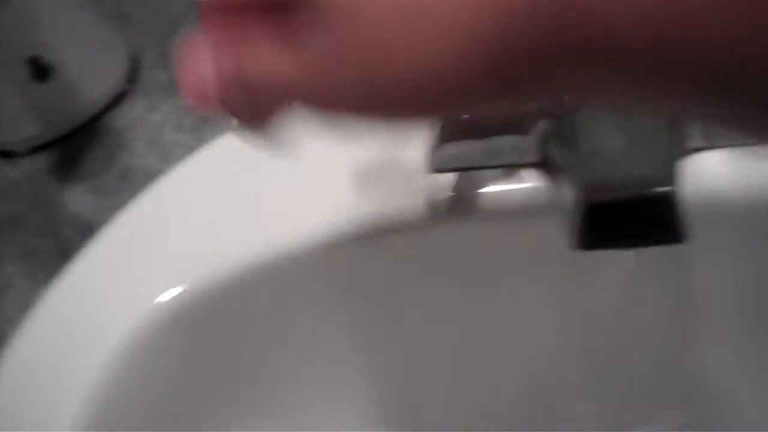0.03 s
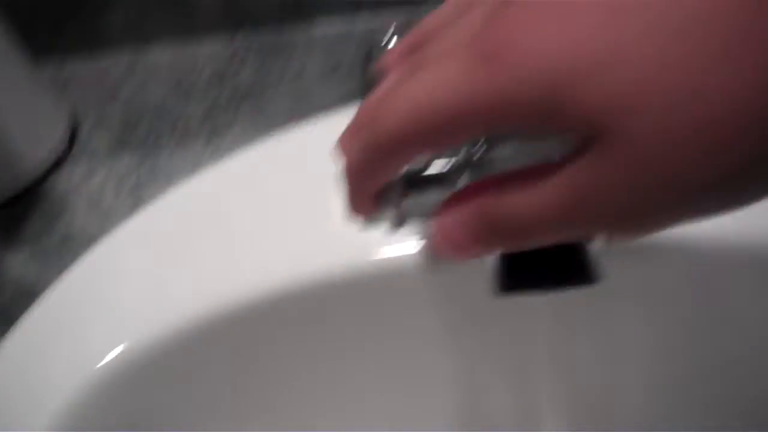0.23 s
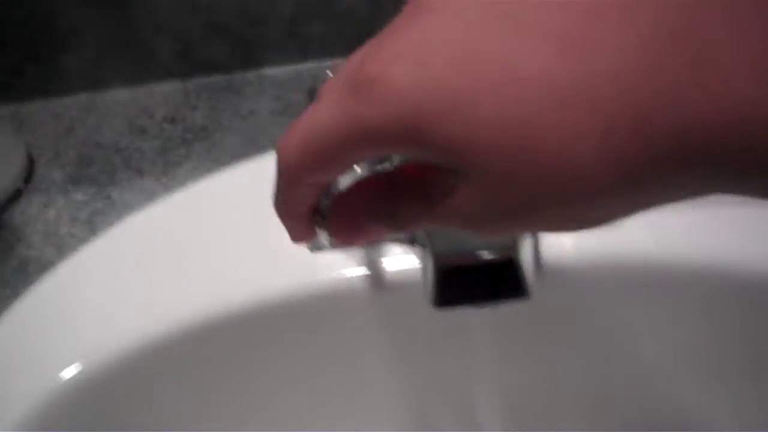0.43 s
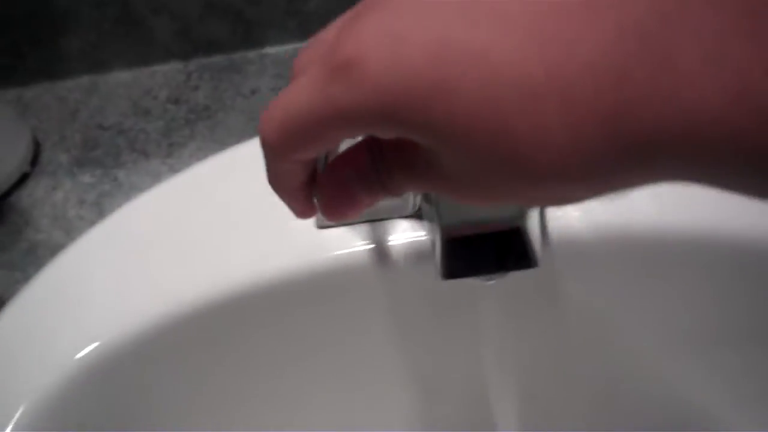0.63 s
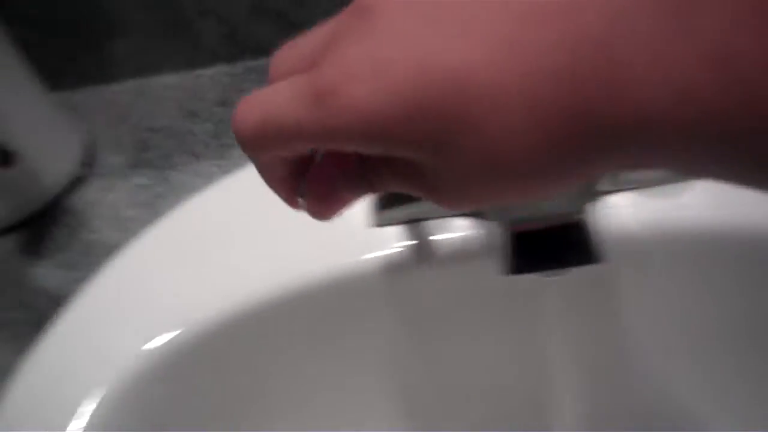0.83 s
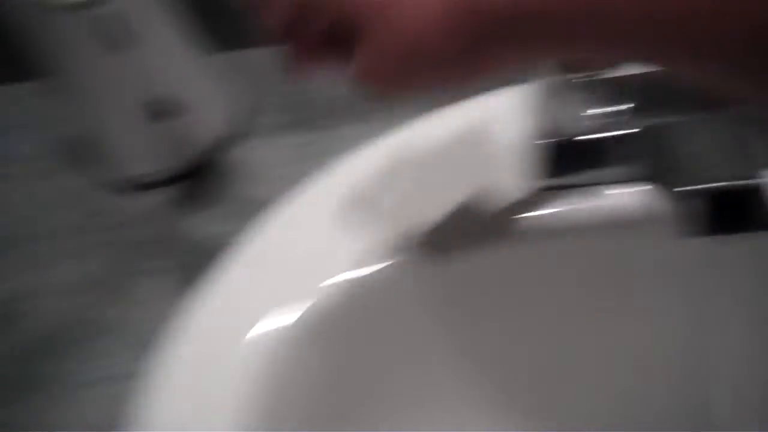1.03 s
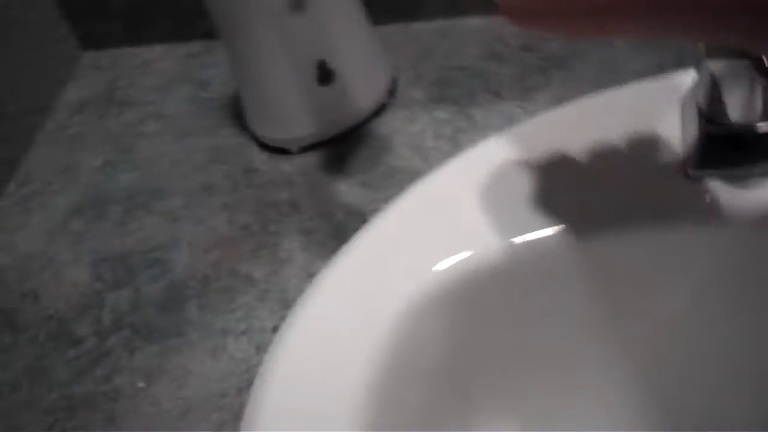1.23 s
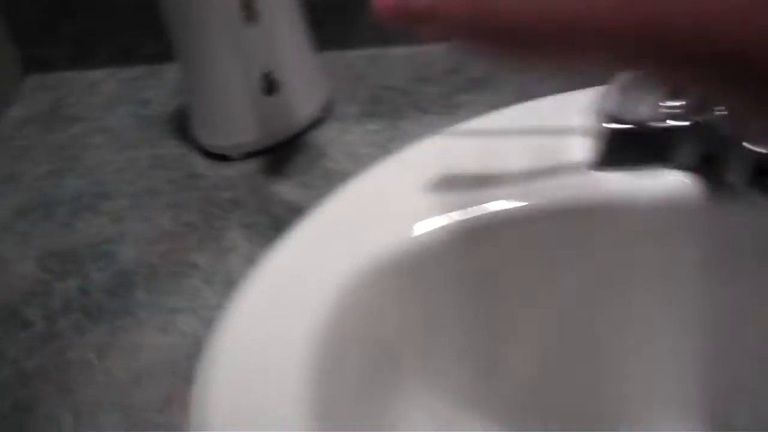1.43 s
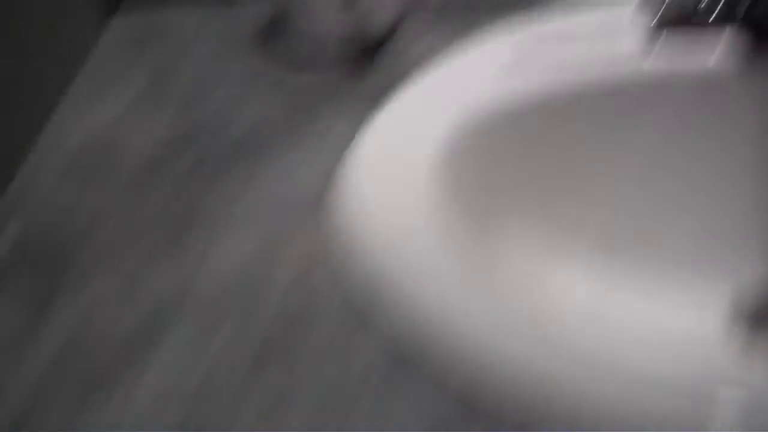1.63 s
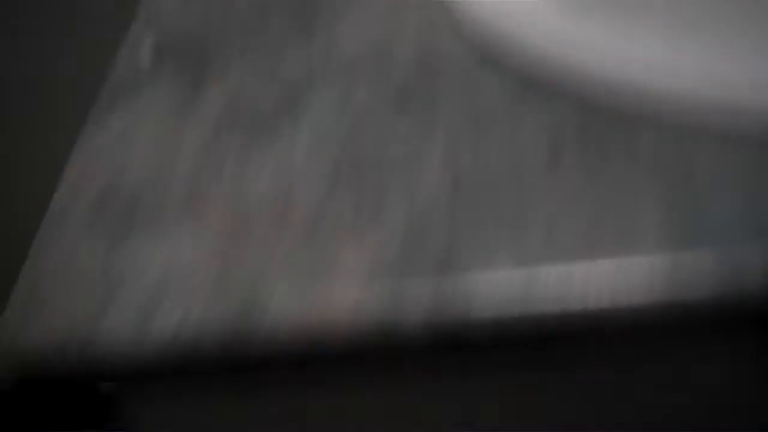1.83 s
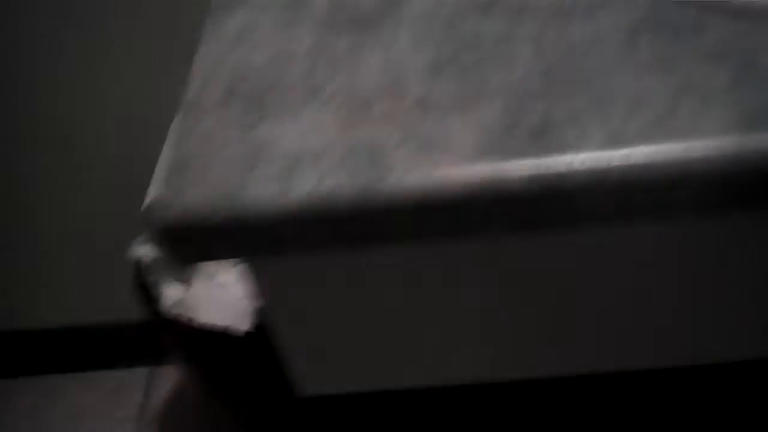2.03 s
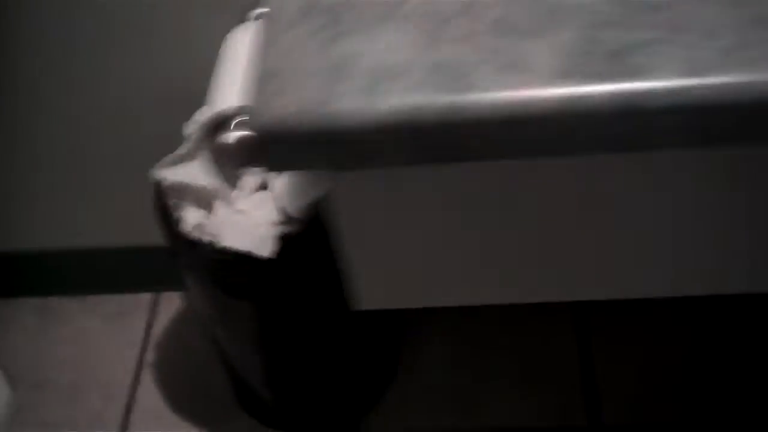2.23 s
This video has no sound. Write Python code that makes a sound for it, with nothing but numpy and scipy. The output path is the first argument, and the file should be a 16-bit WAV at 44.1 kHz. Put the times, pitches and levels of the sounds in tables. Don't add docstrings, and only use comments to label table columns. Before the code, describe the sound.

Bathroom tap water bursts on with a clunk, spatters brightly, then clunks off and drips away.

```python
import sys
import numpy as np
from scipy import signal
from scipy.fft import rfft, irfft, next_fast_len
from scipy.io import wavfile
from scipy.ndimage import uniform_filter1d, map_coordinates

SR = 44100
rng = np.random.default_rng(int(sys.argv[2]) if len(sys.argv) > 2 else 0)


def to_linear_factor(level_db):
    exponent = np.asarray(level_db, float) / 20
    return 10 ** exponent


def waveform_to_disk(signal):
    frames = np.transpose(np.atleast_2d(signal))
    scaled = np.clip(frames, -1, 1) * 32767
    samples = np.round(scaled).astype(np.int16)
    wavfile.write(sys.argv[1], SR, samples)


N = 101429
TIME = np.arange(N) / SR

# f/Hz, density/dB per Hz
ROOM_TONE = [(25, -17), (100, -3), (180, -13), (300, -0.5), (500, -2.5), (900, -7.5), (1400, -14),
             (3000, -32)]
# f/Hz, density/dB per Hz
CLOTH_COLOUR = [(150, -2.5), (500, 4), (1200, 1.5), (2500, 1), (5000, -0.5), (8000, -6), (11000, -12),
                (15000, -7)]
# t/s, level/dB, spread/s
RUSTLES = [
    (0, -52, 0.022),
    (1.8, -61.5, 0.044),
    (1.93, -52.5, 0.02),
    (2.05, -60, 0.034),
    (2.23, -52.5, 0.042),
]
# t/s, level/dB, spread/s
HANDLING = [
    (.03, -49, 0.058),
    (.34, -31.5, .02),
    (1.31, -41.5, 0.076),
    (1.45, -47.5, 0.018),
    (1.545, -49.5, 0.019),
    (1.6, -49.5, 0.014),
    (1.78, -52.5, 0.03),
]
# f/Hz, density/dB per Hz
GRIP_COLOUR = [(30, -46), (85, -1), (300, -9.5), (900, -7), (2000, -48)]
ROOM_TONE_DB, CLOTH_DB = -55, -59
CLOTH_LAG_S, CLOTH_PAN_DB = .00007, -4

# f/Hz, t60/s
TILE_DECAY = [(200, 0.45), (1000, 0.28), (4000, 0.46), (12000, 0.096)]
WET_DB, KNOCK_WET_DB = -14.5, -12.5
# f/Hz, likeness/0..1
LIKENESS = [(60, .8), (300, .95), (1400, .83), (3000, .76), (6500, .68), (14000, .45)]

# t/s, level/dB, t60/s
SPITS = [
    (.1152, -32.5, 0.084),
    (.1456, -41.5, 0.065),
]
# f/Hz, width/Hz, level/dB
VALVE_MODES = [(2350, 180, 5.5), (3700, 450, -2), (4800, 400, -8.5), (8130, 360, -4)]
# t/s, level/dB
WHINE = [(.14, -70), (.158, -42), (.19, -41), (.23, -38), (.27, -40), (.4, -65)]

# t/s, level/dB, rise/s
OPEN, SHUT = (.3112, -6.5, 0.005), (1.2831, -8, 0.0012)
# f/Hz, level/dB, t60/s
OPEN_MODES = [(172.3, -18, 0.25), (640, -14, 0.4), (780, -6.5, 0.034), (1484, 7, 0.021), (2164, -21, 0.17),
              (2074, 16.5, 0.017), (2710, 11, 0.016), (5200, 0, 0.012), (3258, 8.5, 0.016)]
# f/Hz, level/dB, t60/s
SHUT_MODES = [(277.7, -19, 0.38), (458, -15.5, 0.3), (735, -13.5, 0.34), (820, -6.5, 0.28),
              (940, -14.5, 0.45), (1747, -10.5, 0.24), (1896, -11.5, .2), (1100, -20, 0.18),
              (2255, -10, 0.1), (2111, 6, 0.038), (1506, 1, 0.024), (2610, 6.5, 0.018), (3500, -1.5, 0.018),
              (3045, -16.5, 0.23)]
# f/Hz, density/dB per Hz
COUNTER = [(90, -21.5), (250, -3), (750, -3.5), (1100, -4.5), (2200, -7.5), (5000, -29)]
BOOM_DB, BOOM_T60_S = -13, 0.2
CRACK_DB, CRACK_T60_S, CRACK_TOP_HZ = 1.5, 0.022, 6000
SMEAR, SMEAR_S = .9, .012
WANDER, WANDER_GROWS = 60, .09
SWELL_SHARE = .03

# t/s, peak level/dB, f/Hz
DROPS = [(0.0757, -47, 7980), (0.0818, -51, 7390), (0.0856, -52, 6700), (0.0959, -49, 8140),
         (0.2112, -18, 7900), (0.221, -16, 7990), (0.2307, -12, 8000), (0.4337, -7, 7130),
         (0.4541, -5, 7040), (0.4711, -10, 6530), (0.4875, -10, 7290), (0.5621, -8, 7350),
         (0.6499, -11, 7240), (0.6891, -10, 7660), (0.7262, -10, 7160), (0.7622, -10, 7190),
         (0.7812, -11, 7620), (0.8082, -10, 7270), (0.8498, -6, 7040), (0.8539, -12, 7480),
         (0.866, -10, 7650), (0.9027, -11, 7840), (0.9483, -8, 6980), (0.9783, -10, 7940),
         (0.9835, -8, 7300), (1.0063, -8, 7480), (1.0353, -9, 7370), (1.1161, -9, 7600),
         (1.1435, -12, 7600), (1.2064, -12, 7250), (1.2119, -18, 8010), (1.2294, -19, 6920),
         (1.2347, -18, 6830), (1.243, -20, 7280), (1.259, -19, 6260), (1.2665, -16, 7100),
         (1.2757, -20, 5400), (1.2988, -18, 6450), (1.3328, -20, 6630), (1.3376, -11, 7120),
         (1.341, -20, 7270), (1.3539, -7, 7200), (1.369, -21, 7290), (1.3724, -23, 6040),
         (1.3978, -28, 5020), (1.4223, -35, 6340), (1.4258, -37, 7350), (1.5054, -44, 7600),
         (1.5117, -44, 7550), (1.5338, -45, 6270), (1.5398, -43, 7670), (1.6864, -47, 6530),
         (1.7083, -49, 7170), (1.7168, -46, 6870), (1.7462, -48, 6910), (1.7535, -48, 6900),
         (1.8055, -46, 6630), (1.9263, -43, 6750)]
# t/s, level/dB
DRIBBLE = [(1.12, -60), (1.2, -41), (1.37, -42), (1.42, -56), (1.5, -66), (1.62, -72), (1.9, -76)]
# t/s, peak level/dB, f/Hz, t60/s
PLOPS = [
    (0.91, -20.5, 861, 0.066),
    (1.543, -43, 295, 0.069),
    (1.614, -42, 927, 0.042),
    (1.713, -37.5, 1000, 0.012),
    (1.763, -40.5, 282, 0.13),
]
SPLAT_DB, SPLAT_T60_S, DROP_TONE_DB, TICKS_PER_S = -12, .013, -1, 220
POP_S, POP_DB, POP_WIDTH_S = .7984, -2.5, .00011

# t/s, level/dB
FLOW = [(.14, -40.5), (.2, -29.5), (.215, -22.5), (.25, -18), (.3, -13.5), (.45, -14.5), (.7, -15.5),
        (1.0, -14.5), (1.13, -14.5), (1.2, -22), (1.3, -26), (1.4, -34.5), (1.47, -48.5), (1.6, -55)]
# f/Hz, density/dB per Hz
SPRAY = [(150, -43), (700, -9), (1800, -8.5), (3000, 1.5), (5000, -2), (7000, -1), (11000, 0), (15000, -1)]
# f/Hz, width/Hz, level/dB
BASIN = [(88, 40, -13), (163, 24, -3.5), (267, 29, 0.5), (353, 33, 3), (440, 40.4, 3), (859, 64, 4.5),
         (973, 85, 4.5), (1270, 370, -1), (3060, 190, -10)]
BODY_GROWS, BODY_DB, BODY_LAG_S = 0.64, -10, 0.04
BODY_SWAY_DB, BODY_PATCHY_DB = .6, 1.2
SPATTER_PER_S, SPATTER_DB, SPATTER_HZ, SPATTER_CYCLES, SPATTER_SPREAD_DB = 1800, -6, 7180, 5.3, 2.5
BUBBLE_PER_S, BUBBLE_DB, BUBBLE_HZ, BUBBLE_CYCLES = 71, -21, 2350, 7.8
PITCH_SPREAD = .29
MIST_HZ, MIST_GROWS, MIST_FROM_S, MIST_LOSS_DB = 9500, 2.3, 0.76, -12

# peak f/Hz, width/Hz, level/dB, roll-off f/Hz
PORTS = [(8130, 755, 15, 21000), (6990, 990, 12, 7920)]
LEFT_LAG_S = .000015


def unit(x):
    return x / np.sqrt(np.mean(x ** 2) + 1e-20)


def along(points, hz):
    f, v = np.transpose(points)
    return np.interp(np.log(hz + 1), np.log(f + 1), v)


def colour(points):
    return lambda f: to_linear_factor(along(points, f))


def curve(rows, lag=0.):
    s, v = np.transpose(rows)
    return np.interp(TIME - lag, s, v)


def during(rows):
    return (TIME > rows[0][0]) * (TIME < rows[-1][0])


def wobble(rate, count=N):
    knots = rng.standard_normal(N // 50)[:int(count * rate / SR) + 4]
    return map_coordinates(knots, [np.arange(count) * rate / SR])


def bursts(rows, rise_s):
    envelope = 0
    for s, db, t60 in rows:
        fall = to_linear_factor(db - 60 * np.maximum(TIME - s, 0) / abs(t60))
        envelope = envelope + fall * np.clip((TIME - s) / rise_s, 0, 1)
    return envelope


def swells(rows):
    return sum(to_linear_factor(db) * np.exp(-.5 * ((TIME - s) / spread) ** 2) for s, db, spread in rows)


def filtered(x, response):
    m = next_fast_len(N + SR // 2)
    return irfft(rfft(x, m) * response(np.fft.rfftfreq(m, 1 / SR)), m)[..., :N]


def peaks(table):
    def response(f):
        total = 0
        for k, (c, w, db) in enumerate(table):
            total = total + (-1) ** k * to_linear_factor(db) * 1j * f * w / (c * c - f * f + 1j * f * w)
        return total
    return response


def late(lag_s):
    return lambda f: np.exp(-1j * np.pi * f * lag_s * np.array([[1], [-1]]))


def paired(pair, response):
    def mid_side(hz):
        turn = np.arccos(np.clip(along(LIKENESS, hz), -1, 1)) / 2
        return response(hz) * [np.cos(turn), np.sin(turn)]
    mid, side = filtered(pair, mid_side)
    return np.array([mid + side, mid - side])


def rush(response, patchy_db):
    z = signal.stft(rng.standard_normal((2, N + 512)), nperseg=256)[2]
    field = uniform_filter1d(rng.standard_normal(z.shape[1:]), size=5, axis=0)
    field = uniform_filter1d(field, size=8, axis=1)
    pair = signal.istft(z * to_linear_factor(patchy_db * unit(field)), nperseg=256)[1][:, :N]
    return unit(paired(pair, response))


def grains(s, hz, t60, db, pan_db, lag_s, glide=0., size=500):
    out = np.zeros((2, N + size))
    start = np.clip(np.round(s * SR).astype(int), 0, N - 1)[:, None]
    place = (start + np.arange(size)).ravel()
    for ch, side in enumerate((.5, -.5)):
        t = np.maximum(np.arange(size) / SR - .0003 - side * lag_s[:, None], 0)
        u = t / t60[:, None]
        envelope = to_linear_factor((db + side * pan_db)[:, None] - 60 * u) * (1 - np.exp(-u * 30))
        wave = envelope * np.sin(2 * np.pi * hz[:, None] * t * (1 + glide * u))
        out[ch] = np.bincount(place, wave.ravel(), N + size)
    return out[:, :N]


def shower(per_s, hz, cycles, spread_db, glide, size):
    n = int(per_s * N / SR)
    u, g = rng.random((n, 2)), rng.standard_normal((n, 3))
    pitch = np.clip(hz * np.exp(PITCH_SPREAD * g[:, 0]), 300, 14000)
    t60 = np.log(1000) * cycles / 2 / pitch
    db = -spread_db * np.log(1 - u[:, 1] + u[:, 1] / 20)
    return unit(grains(u[:, 0] * N / SR, pitch, t60, db, 3 * g[:, 1], .00004 * g[:, 2], glide, size=size))


def quiet():
    cloth = (to_linear_factor(CLOTH_DB) + swells(RUSTLES)) * to_linear_factor(0.63 * wobble(29.17))
    cloth = cloth * rush(colour(CLOTH_COLOUR), patchy_db=3.0)
    cloth = to_linear_factor([[CLOTH_PAN_DB / 2], [-CLOTH_PAN_DB / 2]]) * filtered(cloth, late(CLOTH_LAG_S))
    grip = swells(HANDLING) * rush(colour(GRIP_COLOUR), patchy_db=0.5)
    tone = to_linear_factor(ROOM_TONE_DB + wobble(16)) * rush(colour(ROOM_TONE), patchy_db=1.5)
    return cloth + grip + tone


def tiles(x):
    hz, t, z = signal.stft(rng.standard_normal((2, SR // 2)), SR, nperseg=256)
    tail = signal.istft(z * to_linear_factor(-60 * t / along(TILE_DECAY, hz)[:, None]), SR, nperseg=256)[1]
    tail = tail / np.linalg.norm(tail[0])
    delayed = np.pad(x, (120, 0))[None]
    return paired(signal.fftconvolve(delayed, tail, axes=1)[:, :N], np.ones_like)


def valve():
    spit = bursts(SPITS, 0.0042) * rush(lambda f: peaks(VALVE_MODES[2:])(f) + .15, patchy_db=0)
    whine = to_linear_factor(curve(WHINE) + 2.5 * wobble(127)) * during(WHINE)
    return spit + whine * rush(peaks(VALVE_MODES), patchy_db=0)


def knock(hit, modes):
    s, db, rise = hit
    size = SR // 2
    t, ring = np.arange(size) / SR, 0
    for hz, level, t60 in modes:
        rate = WANDER + WANDER_GROWS * hz
        share = np.clip(SMEAR * min(10 * t60, 1) ** 2, 0, 1) * (1 - np.exp(-(t / SMEAR_S) ** 2))
        stray = wobble(rate, count=size) + 1j * wobble(rate, count=size)
        sway = np.sqrt(1 - share) + np.sqrt(share / 2) * stray
        envelope = to_linear_factor(level - 60 * t / t60) * (1 - np.exp(-t / (SWELL_SHARE * t60)))
        ring = ring + envelope * np.imag(sway * np.exp(2j * np.pi * hz * t))
    crack = filtered(rng.standard_normal(size), lambda f: 1 / (1 + 1j * f / CRACK_TOP_HZ))[:size]
    crack = to_linear_factor(CRACK_DB - 60 * t / CRACK_T60_S) * crack
    boom = unit(filtered(rng.standard_normal(N), colour(COUNTER)))[:size]
    boom = to_linear_factor(BOOM_DB - 60 * t / BOOM_T60_S) * boom
    blow = to_linear_factor(db) * (1 - np.exp(-(t / rise) ** 2)) * (ring + crack + boom)
    return np.pad(blow, (round(s * SR), N))[:N]


def drops():
    s, db, hz = np.transpose(DROPS)
    none = 0 * s
    splats = to_linear_factor(SPLAT_DB) * bursts(zip(s - .001, db, SPLAT_T60_S + none), .0008)
    splats = splats * rush(lambda f: (f / (f + 2500)) ** 2, patchy_db=0)
    tones = grains(s - .0006, hz, .0028 + none, db + DROP_TONE_DB, none, none, size=160)
    ticks = to_linear_factor(curve(DRIBBLE)) * during(DRIBBLE) * shower(TICKS_PER_S, 4570, 3.5, 2, 0.21, size=200)
    s, db, hz, t60 = np.transpose(PLOPS)
    plops = grains(s, hz, np.abs(t60), db + 3, 0 * s - 2, 0 * s, 0.013, size=5000)
    return splats + tones + ticks + plops


def port_pop():
    return to_linear_factor(POP_DB) * np.exp(-.5 * ((TIME - POP_S) / POP_WIDTH_S) ** 2)


def jet():
    on = np.clip((TIME - FLOW[0][0]) / 0.013, 0, 1) * np.clip((FLOW[-1][0] + 0.054 - TIME) / 0.081, 0, 1)
    flow_db, late_db = curve(FLOW) - 9, curve(FLOW, BODY_LAG_S) - 9
    top = flow_db.max()
    spray = to_linear_factor(2.4 * wobble(39.83) + 2.4 * wobble(250)) * rush(colour(SPRAY), patchy_db=1.5)
    spatter = shower(SPATTER_PER_S, SPATTER_HZ, SPATTER_CYCLES, SPATTER_SPREAD_DB, 0., size=160)
    spray = spray + to_linear_factor(SPATTER_DB) * spatter
    mist = filtered(spray, lambda f: 1 / (1 + (MIST_HZ / (f + 1)) ** 8))
    thinning_db = (MIST_GROWS - 1) * (flow_db - top) * (TIME > MIST_FROM_S)
    spray = spray - mist * (1 - to_linear_factor(np.maximum(thinning_db, MIST_LOSS_DB)))
    basin = to_linear_factor(BODY_SWAY_DB * wobble(11.35)) * rush(peaks(BASIN), BODY_PATCHY_DB)
    bubbles = shower(BUBBLE_PER_S, BUBBLE_HZ, BUBBLE_CYCLES, 1.4, 0.19, size=2000)
    body = to_linear_factor(BODY_DB) * basin + to_linear_factor(BUBBLE_DB) * bubbles
    body = to_linear_factor(top + BODY_GROWS * (late_db - top)) * body
    return on * (to_linear_factor(flow_db + 0.59 * wobble(11.7)) * spray + body)


def scene():
    water = jet() + drops() + valve()
    out = quiet() + water + to_linear_factor(WET_DB) * tiles(water.mean(axis=0))
    for hit in (knock(OPEN, OPEN_MODES), knock(SHUT, SHUT_MODES)):
        out = out + hit * to_linear_factor(np.array([[-.6], [.6]])) + to_linear_factor(KNOCK_WET_DB) * tiles(hit)
    out[0] -= port_pop()
    return out


def top_cut(x):
    return signal.sosfilt(signal.butter(12, 14900, fs=SR, output="sos"), x)


def record(dry):
    def port(f):
        return np.array([(1 + peaks([(c, w, db)])(f)) / np.sqrt(1 + (f / top_hz) ** 6)
                         for c, w, db, top_hz in PORTS])
    x = filtered(dry, lambda f: port(f) * late(LEFT_LAG_S)(f))
    x = x / (1 + np.abs(x) ** 8) ** (1 / 8)
    mix = filtered(x, lambda f: f < 14300)
    return top_cut(mix)


dry = scene()
out = record(dry)
waveform_to_disk(out)
```